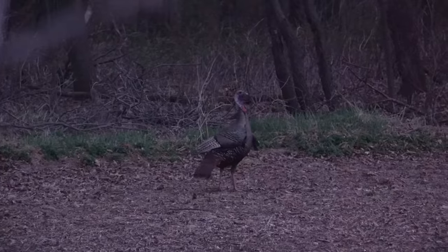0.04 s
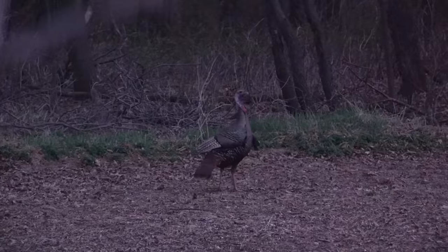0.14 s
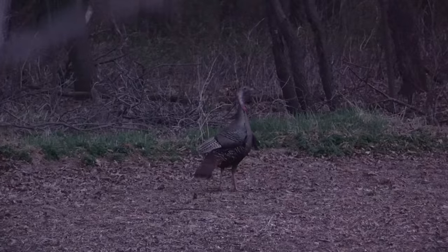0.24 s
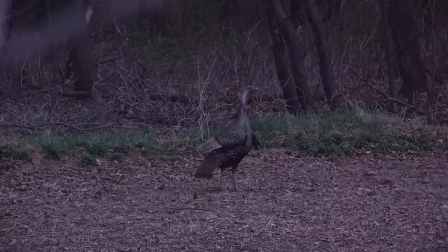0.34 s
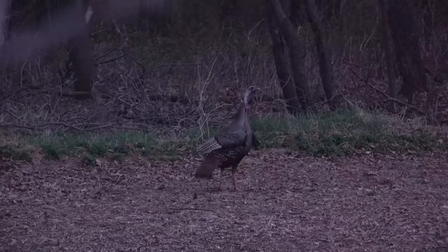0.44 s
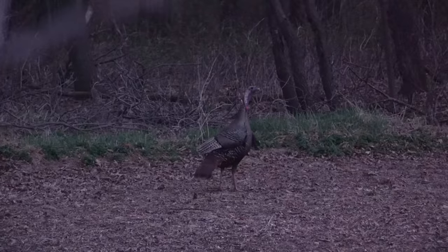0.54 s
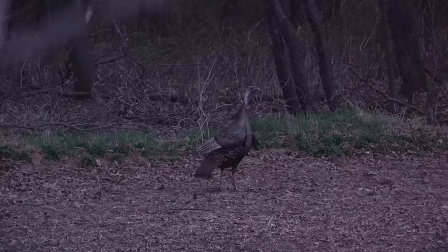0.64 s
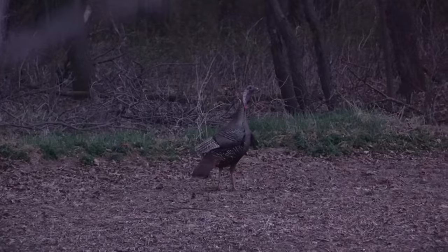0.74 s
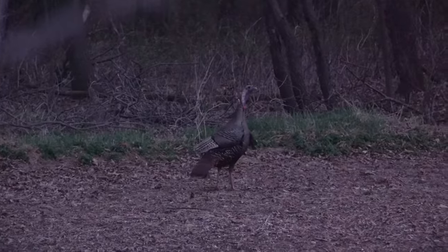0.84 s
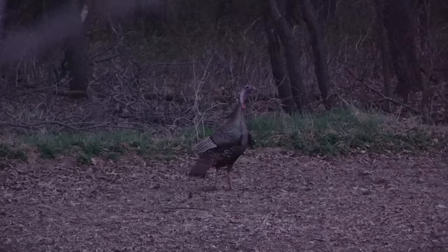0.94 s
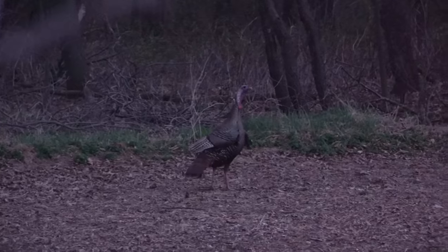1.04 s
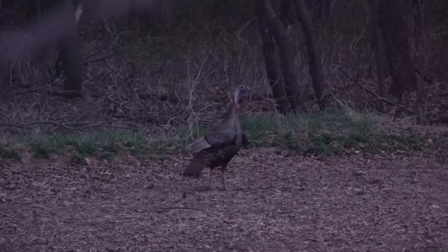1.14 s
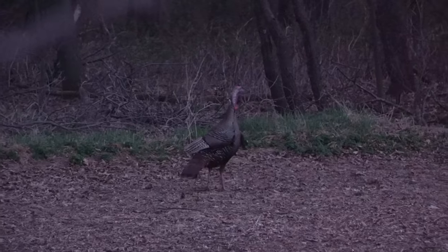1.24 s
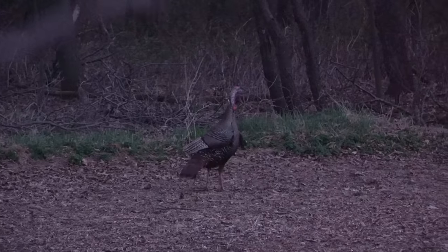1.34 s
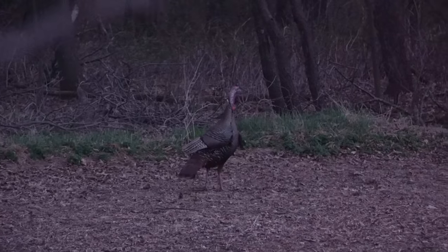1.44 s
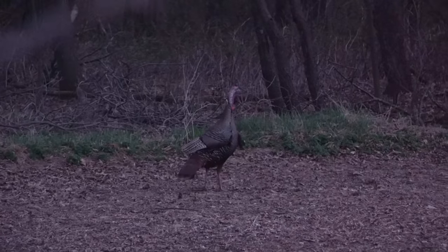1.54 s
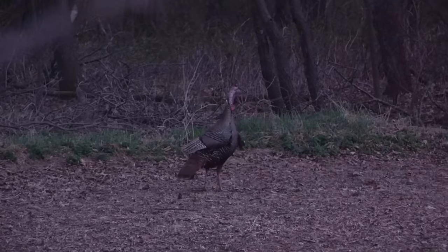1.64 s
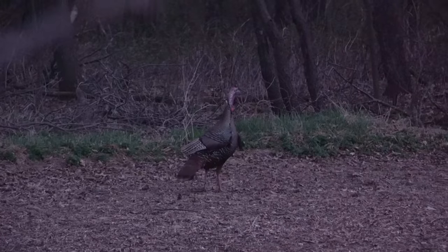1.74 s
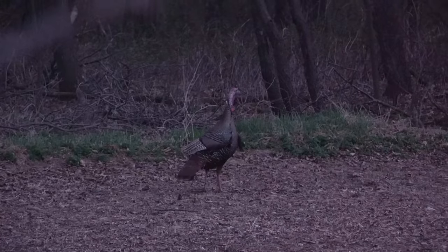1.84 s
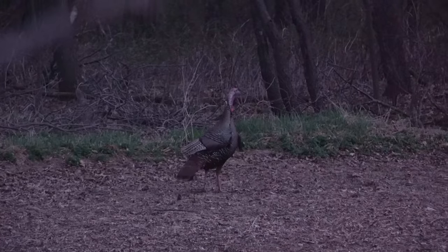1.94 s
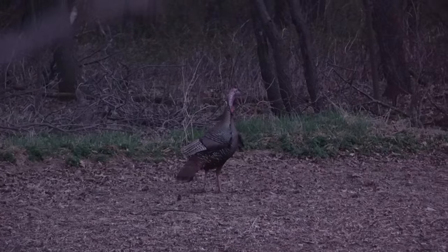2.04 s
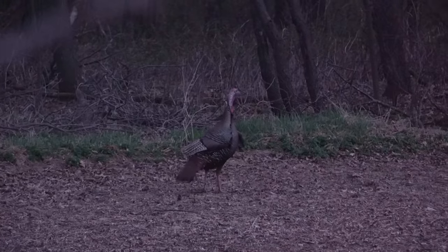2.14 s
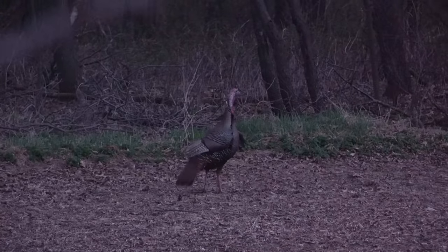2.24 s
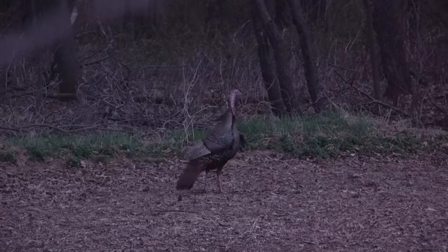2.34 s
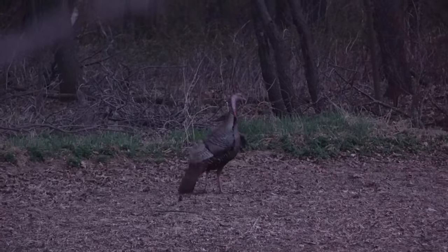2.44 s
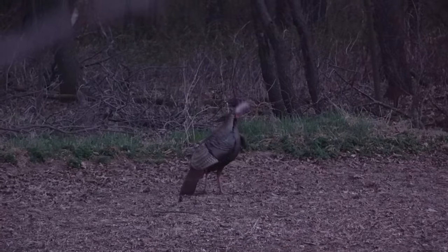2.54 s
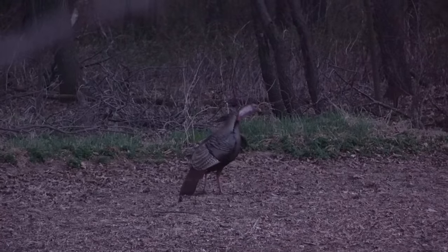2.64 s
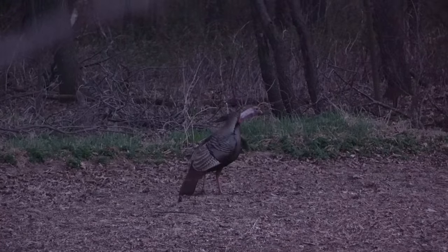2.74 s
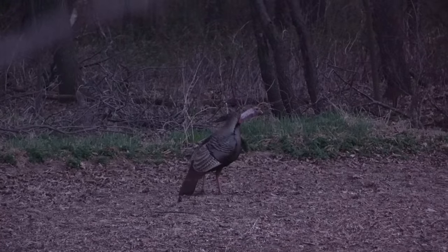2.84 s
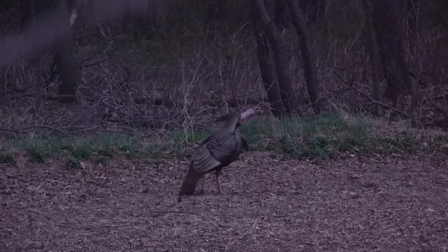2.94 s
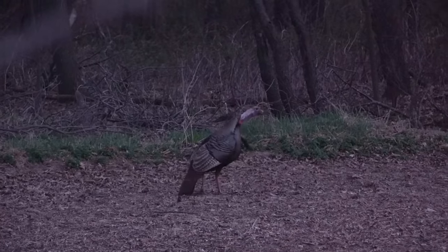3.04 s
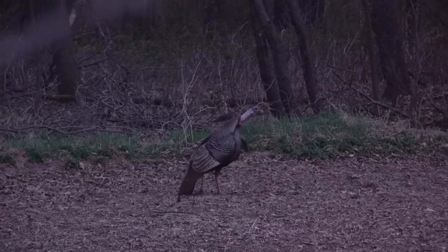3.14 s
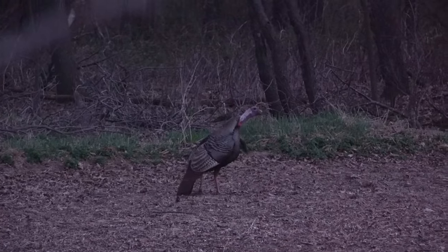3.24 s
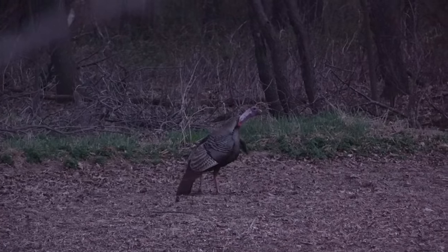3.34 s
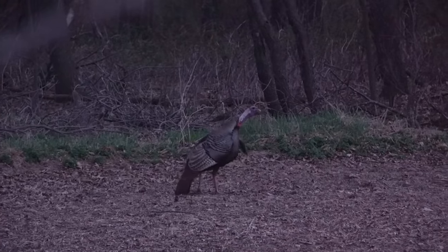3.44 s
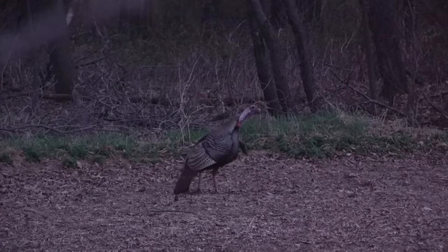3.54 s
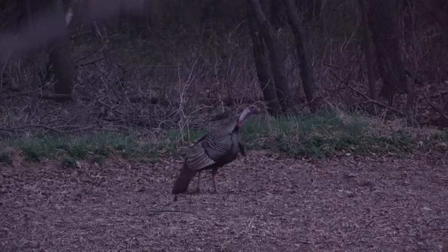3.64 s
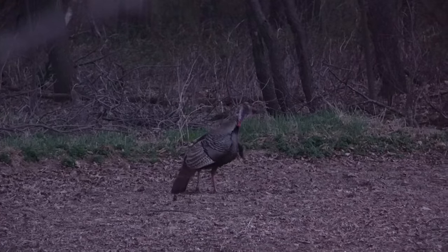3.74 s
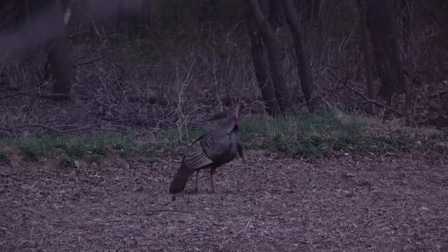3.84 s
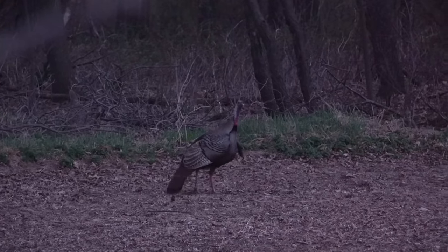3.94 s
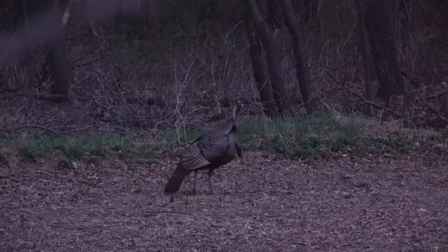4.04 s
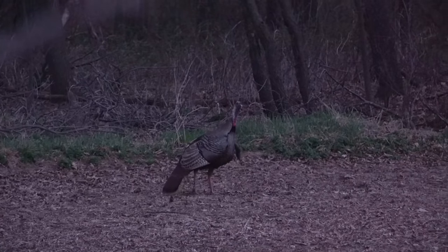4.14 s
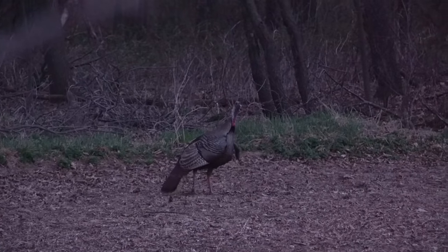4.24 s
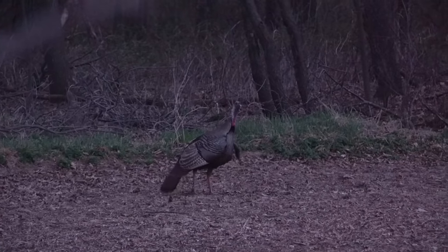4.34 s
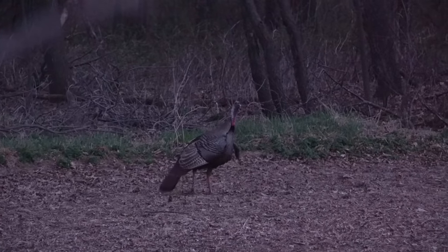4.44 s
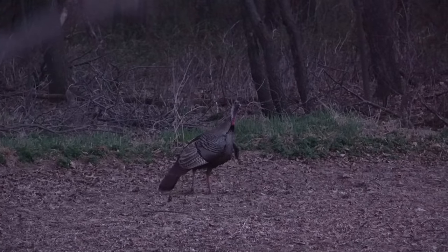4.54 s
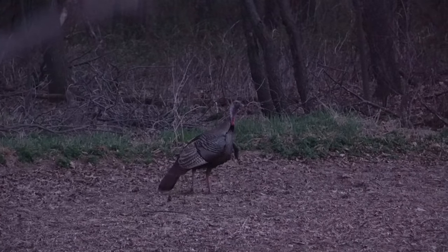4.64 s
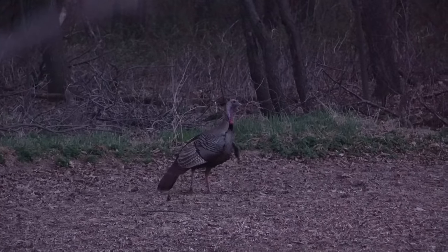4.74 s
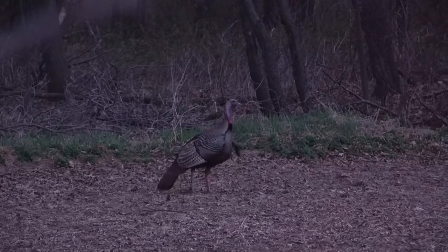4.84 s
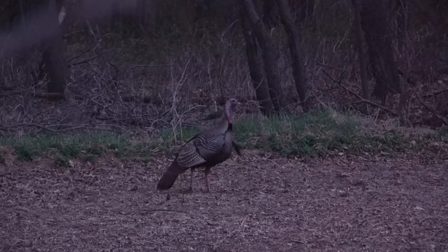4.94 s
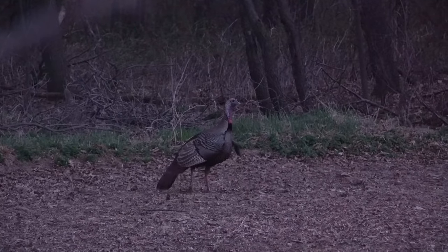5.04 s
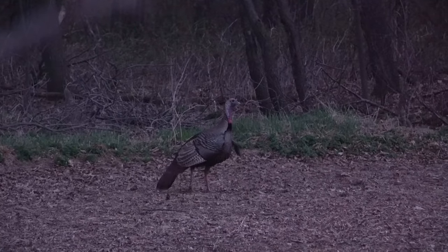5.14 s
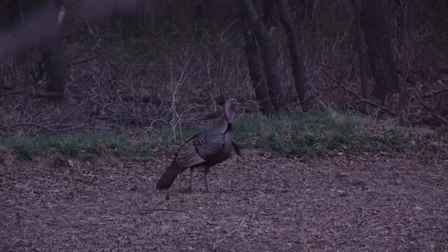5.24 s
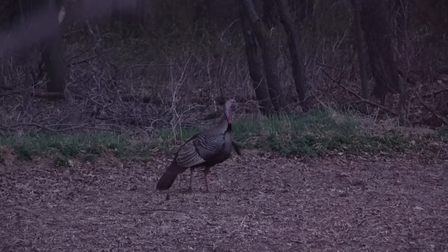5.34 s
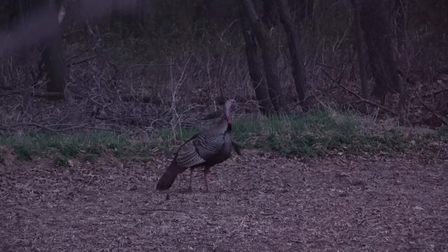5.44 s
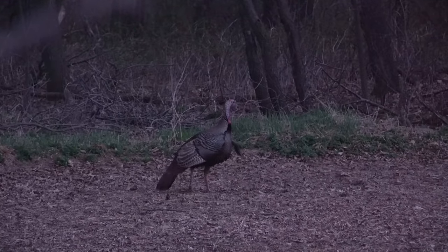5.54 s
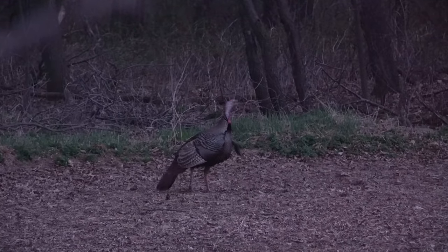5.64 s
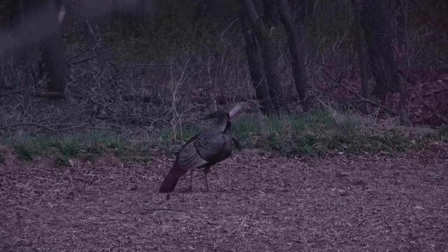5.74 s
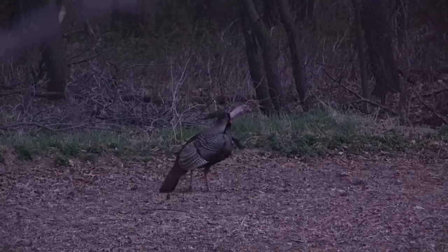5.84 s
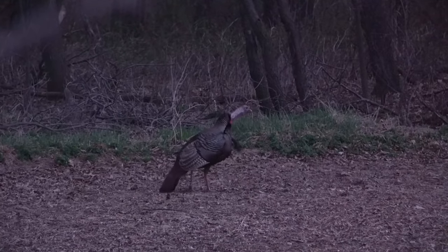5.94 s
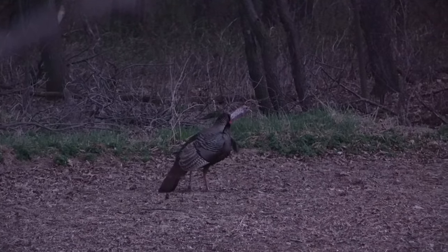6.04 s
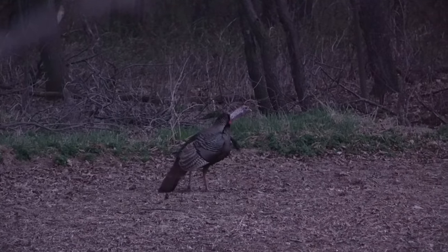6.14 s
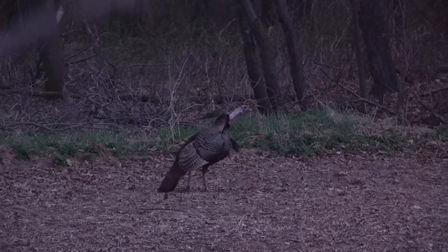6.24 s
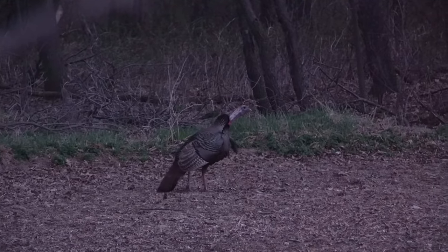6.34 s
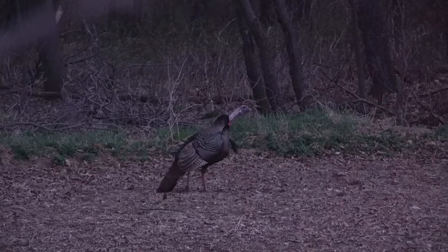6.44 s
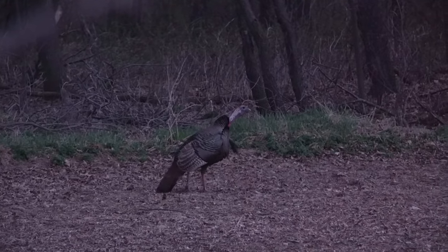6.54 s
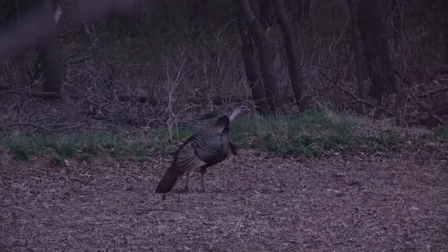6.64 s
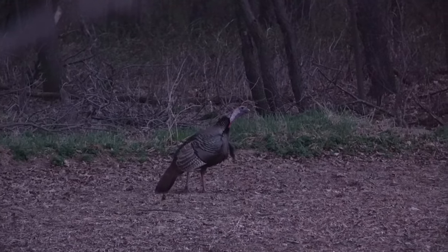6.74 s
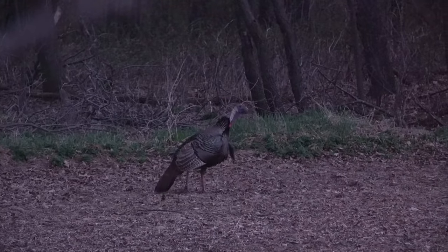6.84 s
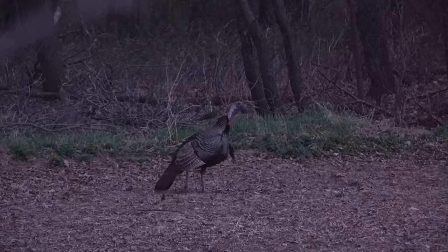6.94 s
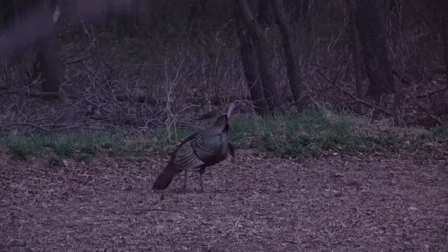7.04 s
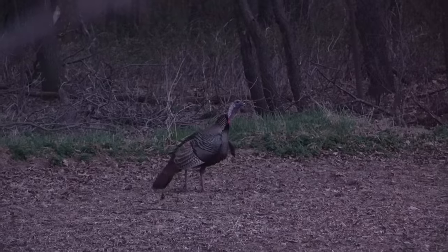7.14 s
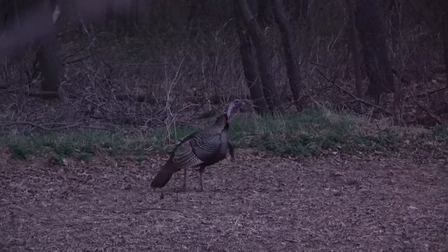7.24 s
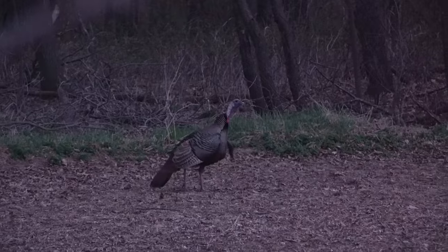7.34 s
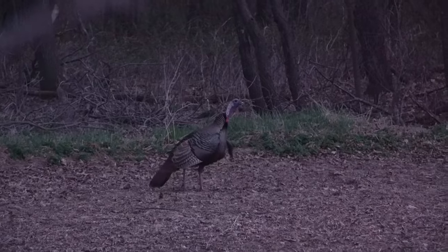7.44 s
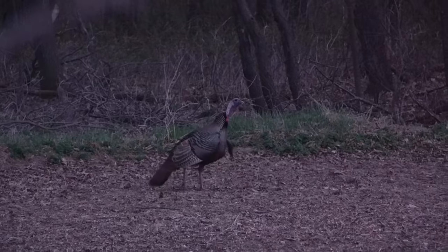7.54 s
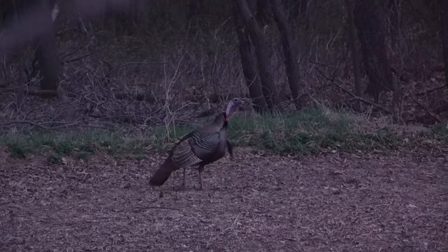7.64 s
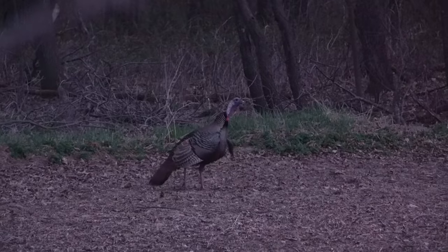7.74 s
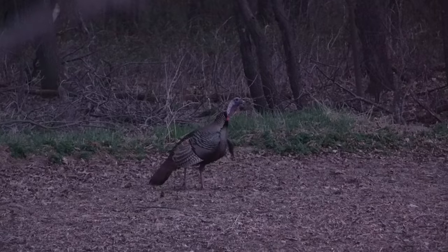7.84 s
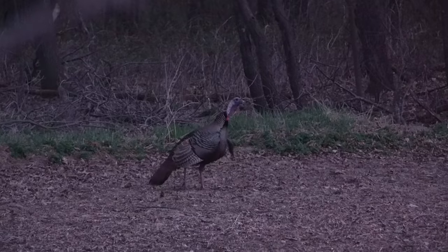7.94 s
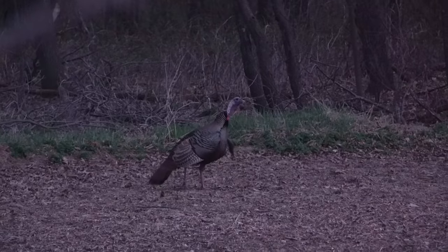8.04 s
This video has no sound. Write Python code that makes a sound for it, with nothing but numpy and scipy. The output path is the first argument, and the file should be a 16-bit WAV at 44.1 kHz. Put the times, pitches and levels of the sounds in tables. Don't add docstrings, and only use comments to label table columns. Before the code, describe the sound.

Wild turkey at a wood's edge gobbles twice in rattling bursts, with small songbird whistles, faint hoarse yelps and low wind rumble on the microphone.

```python
import sys
import numpy as np
from scipy import signal
from scipy.fft import rfft, irfft, next_fast_len
from scipy.io import wavfile
from scipy.ndimage import uniform_filter1d, map_coordinates

SR = 44100
rng = np.random.default_rng(int(sys.argv[2]) if len(sys.argv) > 2 else 0)


def ratio_of_db(decibels):
    return 10 ** (np.asarray(decibels, float) / 20)


def dump(signal):
    limited = np.clip(np.atleast_2d(signal).T, -1, 1)
    pcm = np.round(limited * 32767).astype(np.int16)
    wavfile.write(sys.argv[1], SR, pcm)


N = 356769

# centre_s, pitch_hz, chest_db, throat_db, brightness_db
GOBBLE_1 = [(2.538, 578, -33, -12.5, -35.5), (2.58, 550, -35.5, -33, -46.5), (2.605, 554.5, -31, -24, -25),
            (2.679, 598, -28, -30.5, -23.5), (2.737, 586, -34.5, -17, -25.5), (2.764, 548, -37.5, -36, -25),
            (2.79, 557, -29, -30, -32), (2.827, 586, -30, -24.5, -24.5), (2.86, 609, -26, -20.5, -26),
            (2.893, 569, -23, -18.5, -28), (2.935, 550, -25.5, -28.5, -27.5),
            (2.981, 578, -27.5, -22.5, -26), (3.045, 561.4, -17.5, -18, -24), (3.116, 569, -42, -16.5, -25),
            (3.132, 554.4, -29.5, -21.5, -43), (3.155, 580.4, -20, -50, -32.5),
            (3.181, 559.7, -21, -22, -23.5), (3.24, 557.6, -27.5, -19, -24.5),
            (3.315, 558, -18.5, -21, -24), (3.378, 566, -30.5, -35, -29.5), (3.4, 554, -27, -22, -32.5),
            (3.468, 546, -23, -23.5, -26), (3.53, 560.5, -27, -28, -29.5), (3.617, 543.6, -32, -29, -35.5),
            (3.683, 521, -41.5, -31.5, -39), (3.735, 547.6, -27, -31.5, -30.5),
            (3.804, 551.4, -32, -34, -37), (3.88, 562, -35, -61, -45.5), (3.93, 516, -40, -38, -41.5)]
# centre_s, pitch_hz, chest_db, throat_db, brightness_db
GOBBLE_2 = [(5.709, 581, -35, -21.5, -38), (5.78, 629, -28, -32, -28), (5.85, 539.5, -32, -31, -27.5),
            (5.918, 578, -23.5, -28, -25.5), (5.967, 605, -21.5, -19.5, -29), (6.017, 553, -27.5, -14, -22),
            (6.056, 582.5, -28.5, -19.5, -25), (6.1, 576.7, -24.5, -16, -29),
            (6.132, 563, -24, -22.5, -29.5), (6.188, 596, -20.5, -40.5, -30),
            (6.238, 559.5, -22.5, -16, -26), (6.27, 535, -24, -39, -29), (6.31, 544, -29, -25.5, -33),
            (6.333, 556.7, -26, -27.5, -25.5), (6.383, 581.7, -20, -22, -26), (6.426, 524, -25, -28, -44),
            (6.453, 569, -43.5, -44, -30), (6.49, 535.6, -28.5, -29.5, -35), (6.535, 551, -19, -24, -29),
            (6.585, 531, -35.5, -32.5, -28.5), (6.61, 558, -28, -38.5, -31), (6.651, 521, -43, -29.5, -36),
            (6.696, 501, -39, -40.5, -41), (6.763, 537, -23, -40, -28), (6.842, 533.4, -47, -35.5, -38.5),
            (6.87, 540, -31, -40.5, -48), (6.936, 540, -33, -44, -44)]
# harmonic, level_db
UPPER_HARMONICS = [(4, -5), (5, -22), (6, -8.5), (7, -12), (8, -30), (9, -30.5), (10, -36)]
# freq_hz, density_db
RASP_SPECTRUM = [(400, -34), (700, -6), (1150, 10), (1700, 3.5), (2700, 0.5), (3500, 3), (4400, -11),
                 (5700, -26.5), (6300, -37), (10000, -27.5)]
# centre_s, pitch_hz, level_db
SECOND_VOICE_1 = [(2.534, 1147, -16.5), (2.582, 1167, -16.5), (2.621, 1176, -25), (2.652, 1262, -27.5),
                  (2.679, 1050, -14.5), (2.733, 1036, -18), (2.769, 1042, -25), (2.791, 1081, -22),
                  (2.853, 1251, -19), (2.88, 1002, -16), (2.901, 1181, -14), (2.989, 955, -20),
                  (3.035, 1016, -22.5), (3.077, 1020, -20.5), (3.115, 996, -15), (3.155, 919, -17),
                  (3.188, 928, -21), (3.221, 985, -23.5), (3.244, 960, -17.5), (3.271, 994, -18),
                  (3.303, 926, -19.5), (3.349, 955, -21.5), (3.389, 897, -18.5), (3.435, 944, -24.5),
                  (3.481, 955, -22), (3.538, 933, -15.5), (3.569, 864, -28), (3.619, 890, -16),
                  (3.64, 843, -37), (3.681, 840, -28), (3.72, 878, -18.5), (3.801, 882, -19),
                  (3.839, 904, -41), (3.872, 880, -30), (3.901, 873, -23), (3.958, 878, -28.5),
                  (3.985, 897, -28.5), (4.03, 860, -40)]
# centre_s, pitch_hz, level_db
SECOND_VOICE_2 = [(5.711, 1196, -11.5), (5.747, 1131, -25.5), (5.773, 1237, -15), (5.803, 1140, -21.5),
                  (5.836, 1270, -22.5), (5.859, 1218, -19), (5.914, 1023, -15.5), (5.969, 1261, -21.5),
                  (5.997, 987, -17), (6.046, 1162, -15), (6.117, 1161, -16), (6.162, 1133, -41),
                  (6.195, 964, -19.5), (6.229, 999, -23), (6.262, 1002, -16.5), (6.297, 1115, -22.5),
                  (6.331, 968, -24), (6.361, 946, -19), (6.395, 976, -21), (6.436, 880, -36.5),
                  (6.462, 937, -25), (6.485, 885, -24.5), (6.539, 890, -23), (6.573, 868, -19.5),
                  (6.616, 950.5, -15), (6.647, 867.5, -24), (6.695, 954, -21), (6.748, 868, -26.5),
                  (6.78, 910, -45.5), (6.829, 874, -21.5), (6.879, 870, -37), (6.9, 855, -25),
                  (6.935, 870, -28), (6.972, 846, -28.5), (7.019, 889, -31), (7.075, 880, -36)]
# start_s, length_s, pitch_hz, level_db
HELD_WHISTLES = [(0, 0.029, 2650, -49), (0.357, 0.068, 2010, -53), (0.407, 0.027, 3040, -40.5),
                 (0.494, 0.055, 2700, -44.5), (0.5, 0.091, 2330, -51), (0.878, 0.023, 3250, -38),
                 (0.897, 0.047, 2320, -39), (0.95, 0.13, 2296, -48), (0.907, 0.049, 3080, -49),
                 (1.108, 0.04, 2590, -50), (1.005, 0.049, 2490, -51), (1.56, 0.028, 3220, -53),
                 (1.701, 0.12, 3000, -53.5), (2.134, 0.03, 2757, -39), (2.456, 0.058, 3134, -39.5),
                 (4.185, 0.045, 3150, -49), (4.571, 0.073, 2306, -36.5), (4.702, 0.096, 3100, -49.5),
                 (4.743, 0.065, 2210, -45), (4.729, 0.02, 2380, -39), (0.334, 0.027, 2730, -46),
                 (1.065, 0.034, 2800, -45), (3.746, 0.017, 2820, -36), (4.703, 0.13, 2640, -49.5),
                 (4.75, 0.054, 2930, -55.5), (4.981, 0.11, 3570, -57.5), (4.893, 0.046, 2445, -54),
                 (7.789, 0.024, 2320, -49)]
# start_s, length_s, top_hz, level_db
SWOOP_WHISTLES = [(0.333, 0.02, 2560, -44), (0.888, 0.02, 3280, -45), (1.08, 0.03, 2610, -47),
                  (1.482, 0.07, 2950, -53), (1.964, 0.027, 3010, -45), (2.155, 0.038, 2430, -40),
                  (2.311, 0.064, 2650, -52), (3.574, 0.066, 2780, -43.5), (4.116, 0.036, 2800, -49),
                  (5.129, 0.06, 3480, -35.5), (5.259, 0.028, 2445, -35), (7.239, 0.062, 2780, -47),
                  (7.759, 0.04, 2815, -49), (7.933, 0.046, 2830, -49.5)]
# start_s, length_s, first_hz, last_hz, level_db
GLIDE_WHISTLES = [(0.255, 0.043, 2380, 2650, -52), (0.362, 0.05, 2380, 2180, -53),
                  (1.41, 0.04, 3300, 3230, -48), (1.439, 0.1, 3194, 3158, -37.5),
                  (1.943, 0.038, 2860, 2735, -47.5), (4.045, 0.13, 3230, 3110, -34),
                  (4.225, 0.064, 2517, 2530, -39), (4.3, 0.096, 2560, 2740, -47.5),
                  (5.398, 0.043, 2520, 2330, -36.5), (5.525, 0.1, 1250, 810, -48.5),
                  (4.769, 0.042, 1306, 1055, -47), (0.452, 0.034, 2250, 2415, -35),
                  (0.826, 0.033, 2880, 2930, -49), (0.851, 0.039, 2890, 3250, -42),
                  (1.56, 0.037, 3270, 2790, -55), (1.595, 0.16, 2394, 2620, -45),
                  (2.046, 0.024, 3160, 2850, -40), (2.096, 0.03, 2295, 2403, -39),
                  (2.393, 0.024, 2210, 2450, -49.5), (3.54, 0.045, 2934, 3270, -39.5),
                  (4.395, 0.033, 2660, 3024, -50), (4.644, 0.022, 3550, 2740, -32.5),
                  (4.588, 0.048, 2600, 2760, -50), (5.145, 0.034, 3300, 2980, -60),
                  (4.668, 0.024, 2370, 2600, -34), (5.209, 0.024, 2293, 3000, -43),
                  (5.225, 0.029, 2910, 3134, -31), (5.356, 0.047, 2830, 2520, -43),
                  (6.895, 0.022, 3350, 3660, -37.5), (6.903, 0.014, 3760, 4660, -46),
                  (6.945, 0.022, 4860, 2860, -42), (7.17, 0.017, 2270, 2420, -45.5),
                  (7.514, 0.065, 2545, 2790, -55), (7.866, 0.026, 2290, 3270, -55),
                  (7.227, 0.025, 3040, 2800, -52), (7.905, 0.035, 2830, 2790, -52),
                  (8.033, 0.012, 2534, 3140, -54), (7.68, 0.09, 1230, 1100, -55.5)]
# start_s, length_s, pitch_hz, level_db
FAR_COOS = [(1.602, 0.041, 1040, -34), (1.84, 0.05, 1130, -34), (1.895, 0.115, 1130, -36),
            (2.05, 0.059, 1100, -41), (2.165, 0.06, 1040, -42), (2.225, 0.06, 960, -41),
            (2.422, 0.11, 1100, -42.5), (4.1, 0.071, 752, -34.5), (4.63, 0.183, 770, -35.5),
            (4.98, 0.16, 497, -35), (5.33, 0.2, 780, -39), (5.56, .12, 510, -44), (5.655, 0.03, 1410, -34),
            (5.678, 0.018, 900, -28), (6.99, 0.035, 630, -36), (7.045, 0.03, 600, -38),
            (7.105, 0.04, 1340, -48), (7.11, 0.05, 860, -43), (7.195, 0.05, 590, -38),
            (7.265, 0.04, 590, -37), (7.36, 0.07, 790, -43), (7.38, 0.035, 660, -38), (7.42, 0.1, 602, -38),
            (7.43, 0.05, 1320, -48), (7.75, 0.04, 800, -43), (7.785, 0.11, 600, -39),
            (7.945, 0.18, 752, -38)]
# centre_s, level_db
YELP_TIMES = [(0.762, -50), (1.051, -47.5), (1.322, -44), (1.608, -46), (1.919, -47), (2.219, -44),
              (4.117, -38.5), (4.418, -38), (4.73, -34), (5.035, -37.5), (5.355, -36.5)]
# freq_hz, width_hz, level_db
THROAT_PEAKS = [(1030, 160, 0), (1480, 260, 1), (2050, 300, -16)]
# centre_s, length_s, level_db
LEAF_PUFFS = [
    (2.603, .035, -52),
    (3.95, 1.1, -62),
    (6.057, .025, -53),
    (6.19, .012, -56),
]
# freq_hz, density_db
RUSTLE_SPECTRUM = [(2500, -29.5), (5000, 6), (8000, 6.5), (10500, -3), (14000, -28.5)]
# freq_hz, t60_s
TRUNK_T60 = [(300, .5), (1000, .36), (2000, 0.4), (4000, 0.4), (8000, 0.22)]
# time_s, level_db
GUST_STRENGTH = [(0.06, -40), (0.5, -41), (1.21, -43.5), (1.5, -48.5), (2.17, -45.5), (3.12, -42),
                 (3.57, -46.5), (3.99, -39), (5.63, -46.5), (5.94, -47.5), (6.45, -42.5), (7.1, -45),
                 (7.3, -35), (7.6, -36.5), (8.03, -40)]
# freq_hz, density_db
RUMBLE_SPECTRUM = [(2.9, -46.5), (5.0, 0.5), (16, 7), (30, -0.5), (78, -11), (200, -30.5), (260, -50),
                   (440, -120)]
# freq_hz, density_db
GUST_MID_SPECTRUM = [(88, 1.5), (150, -6), (262, 1), (318, 1), (551, -6), (601, -5.5), (1360, -19.5),
                     (1500, -52), (1950, -69), (3300, -120)]
# freq_hz, density_db
GUST_SIDE_SPECTRUM = [(8.8, -30), (15, -27), (134, 0), (212, -15.5), (316, -13), (389, -3.5), (510, -4),
                      (1420, -21), (2200, -20), (2860, -29), (4840, -120)]
# freq_hz, density_db
BLUR_SPECTRUM = [(650, -15.5), (1100, 4), (1200, -6), (1500, 3), (2490, 2.5), (2940, -2), (3410, 4),
                 (4070, -9.5), (5060, -41.5), (6580, -34.5), (11100, -120)]
# freq_hz, density_db
HISS_SPECTRUM = [(800, -31.5), (1500, -3.5), (5000, 0), (9000, -4.5), (15000, -4.5), (20000, -20.5)]
# freq_hz, level_db
WHINE_TONES = [(9000, -84), (11500, -86), (12500, -82), (13500, -83), (14500, -84), (15000, -86)]

SETTLE_S = .06


def rms_one(x):
    return x / np.sqrt(np.mean(x ** 2) + 1e-20)


def at_hz(points, hz):
    table_hz, value = np.transpose(points)
    return np.interp(np.log(hz + 0.00084), np.log(table_hz), value)


def coloured(spectrum):
    size = next_fast_len(N)
    hz = np.fft.rfftfreq(size, 1 / SR)
    bins = rfft(rng.standard_normal(size)) * ratio_of_db(at_hz(spectrum, hz))
    return rms_one(irfft(bins, size)[:N])


def drift(rate_hz):
    coarse = np.arange(0, N + 16, 16)
    curve = map_coordinates(rng.standard_normal(4000), [coarse / SR * rate_hz], order=3)
    return np.interp(np.arange(N), coarse, curve)


def resonance(x, hz, width_hz):
    r = np.exp(-np.pi * width_hz / SR)
    b = [(1 - r * r) / 2, 0, (r * r - 1) / 2]
    a = [1, -2 * r * np.cos(2 * np.pi * hz / SR), r * r]
    return signal.lfilter(b, a, x)


def lowpass(x, order, cut_hz):
    return signal.sosfilt(signal.butter(order, cut_hz, fs=SR, output="sos"), x)


def add(track, start_s, piece):
    at = max(round(start_s * SR), 0)
    track[at:at + len(piece)] += piece[:N - at]


def with_age(*bouts):
    return [(row[0] - notes[0][0], *row) for notes in bouts for row in notes]


def gobble():
    chest_gain_db, third_gain_db, bright_gain_db, octave_gain_db = 7, 3, 8.5, -2
    top_gain_db_per_s, fourth_fade_db_per_s = 5, 3
    note_lean = .025
    muffled_hz, muffled_s = 4000, 0.21
    out = np.zeros(N)
    rasp = coloured(RASP_SPECTRUM) * ratio_of_db(2.5 * drift(130) - 1)
    muffled = lowpass(rasp, 6, muffled_hz)
    wobble = .011 * drift(120)
    flutter = [ratio_of_db(3.5 * drift(100)) for _ in range(4)]
    rows = with_age(GOBBLE_1, GOBBLE_2)
    phases = rng.uniform(0, 2 * np.pi, (len(rows), 12))
    for (age, centre, hz, chest_db, third_db, bright_db), phase in zip(rows, phases):
        opening = age == 0
        if opening:
            length_s, arch, lean, swell_power, bright_power = .056, .33, 0, .45, 1
        else:
            length_s, arch = .047, .04 + .25 * np.exp(-age / SETTLE_S)
            lean, swell_power, bright_power = note_lean * np.cos(phase[-1]), .75, 1.7
        place = np.linspace(-1, 1, round(length_s * SR))
        at = round((centre - length_s / 2) * SR)
        span = slice(at, at + len(place))
        swell = np.cos(place * np.pi / 2) ** swell_power
        pitch_hz = hz * (1 - arch * place ** 2 + lean * place + wobble[span])
        turn = 2 * np.pi * np.cumsum(pitch_hz) / SR

        low = [(1, chest_db + chest_gain_db),
               (2, (chest_db + third_db) / 2 + octave_gain_db),
               (3, third_db + third_gain_db)]
        voice = np.zeros(len(place))
        for k, db in low:
            waver = flutter[k - 1][span] ** min(0.5 + 9 * age, 1)
            voice += ratio_of_db(db) * waver * np.sin(k * turn + phase[k])

        upper = np.zeros(len(place))
        for k, db in UPPER_HARMONICS:
            db += age * (top_gain_db_per_s * (k > 7) - fourth_fade_db_per_s * (k == 4))
            upper += ratio_of_db(db) * flutter[k % 4][span] * np.sin(k * turn + phase[k])
        hoarse = rasp[span] + np.exp(-age / muffled_s) * (muffled[span] - rasp[span])
        upper += ratio_of_db(-4 + 10 * np.exp(-age / .3)) * hoarse * (1 + .7 * np.sin(turn))
        voice += ratio_of_db(bright_db + bright_gain_db) * upper * swell ** bright_power
        add(out, centre - length_s / 2, voice * swell)
    return out


def second_voice():
    note_s, droop, gain_db = .035, .02, 4
    out, wobble, flutter = np.zeros(N), .04 * drift(300), ratio_of_db(3.2 * drift(180))
    place = np.linspace(-1, 1, round(note_s * SR))
    swell = np.cos(place * np.pi / 2) ** 0.9
    for age, centre, hz, level_db in with_age(SECOND_VOICE_1, SECOND_VOICE_2):
        scoop = .2 * np.exp(-age / SETTLE_S) * np.minimum(place, 0) ** 2
        at = round((centre - note_s / 2) * SR)
        pitch_hz = hz * (1 - scoop - droop * place + wobble[at:at + len(place)])
        turn = 2 * np.pi * np.cumsum(pitch_hz) / SR
        tone = np.sin(turn) + ratio_of_db(-21) * np.sin(2 * turn)
        add(out, at / SR, ratio_of_db(level_db + gain_db) * swell * tone)
    return out * flutter


def whistles(rows, tremble_db):
    out, tremble, waver = np.zeros(N), ratio_of_db(tremble_db * drift(55)), .006 * drift(50)
    for start, length, first_hz, middle_hz, last_hz, level_db in rows:
        place = np.linspace(0, 1, round(length * SR))
        hz = np.interp(place, [0, .5, 1], [first_hz, middle_hz, last_hz])
        hz = uniform_filter1d(hz, len(place) // 4, mode="nearest")
        hz *= 1 + np.roll(waver, -round(start * SR))[:len(place)]
        attack = place * length / (.006 + .09 * length)
        release = (1 - place) * length / .009
        edge = np.clip(np.minimum(attack, release), 0, 1)
        edge *= ratio_of_db(-22 * length * (place - .5))
        add(out, start, ratio_of_db(level_db) * edge * np.sin(2 * np.pi * np.cumsum(hz) / SR))
    return out * tremble


def songbirds():
    rest_hz, halfway = 2260, .76
    rows = [(s, length, hz * 1.025, hz, hz * .99, db) for s, length, hz, db in HELD_WHISTLES]
    for s, length, top_hz, db in SWOOP_WHISTLES:
        rows.append((s, length, top_hz, top_hz + halfway * (rest_hz - top_hz), rest_hz, db))
    for s, length, first_hz, last_hz, db in GLIDE_WHISTLES:
        rows.append((s, length, first_hz, (first_hz + last_hz) / 2, last_hz, db))
    return whistles(rows, tremble_db=1.7)


def far_coos():
    return whistles([(s, length, hz, hz, hz, db) for s, length, hz, db in FAR_COOS], tremble_db=3)


def crow_stutter():
    start_s, gap_s, pip_s, pip_db = 1.676, .034, .02, -39
    crow_hz, climb_hz, droop_hz = 1150, 150, 45
    rows = []
    for k in range(5):
        hz = crow_hz - climb_hz * 3. ** -k
        rows.append((start_s + gap_s * k, pip_s, hz + droop_hz, hz, hz - droop_hz, pip_db))
    return whistles(rows, tremble_db=0)


def yelps():
    yelp_s, pitch_hz = 0.1, 521
    out, shake, breath = np.zeros(N), drift(150), rng.standard_normal(N)
    place = np.linspace(-1, 1, round(yelp_s * SR))
    for centre, level_db in YELP_TIMES:
        at = round(centre * SR)
        span = slice(at, at + len(place))
        turn = np.cumsum(pitch_hz * (1 - 0.0532 * place + 0.034 * shake[span])) / SR
        pulses = np.diff(np.floor(turn), prepend=0)
        source = rms_one(pulses) + 2.0 * breath[span]
        throat = sum(ratio_of_db(db) * resonance(resonance(source, f, w), f, w) for f, w, db in THROAT_PEAKS)
        add(out, centre - yelp_s / 2, ratio_of_db(level_db) * rms_one(throat) * np.cos(place * np.pi / 2))
    return out


def rustles():
    out = np.zeros(N)
    for centre, length, level_db in LEAF_PUFFS:
        add(out, centre - length / 2, ratio_of_db(level_db) * np.hanning(round(length * SR)))
    return out * coloured(RUSTLE_SPECTRUM)


def chorus():
    start, length, pitch, bend, size = rng.random((110, 5)).T
    hz = 2000 + 1600 * pitch
    first_hz, last_hz = hz + 500 * (bend - .4), hz - 150 * (bend - .5)
    rows = np.transpose([8 * start, .04 + .14 * length, first_hz, hz, last_hz, -62 + 6 * size])
    return whistles(rows, tremble_db=3.5)


def wood(x):
    t = np.arange(SR) / SR
    white, tail = rng.standard_normal((2, SR)), np.zeros((2, SR))
    for low_hz in 250 * 2. ** np.arange(5):
        octave = signal.butter(2, [low_hz, 2 * low_hz], "band", fs=SR, output="sos")
        tail += signal.sosfilt(octave, white) * ratio_of_db(-60 * t / at_hz(TRUNK_T60, 1.4 * low_hz))
    tail *= np.clip((t - .008) / 0.013, 0, 1)
    tail /= np.sqrt(np.sum(tail[0] ** 2))
    mid, side = signal.fftconvolve(x[None], tail, axes=1)[:, :N]
    return mid, side


def sway(wet):
    spread_s = .00035
    path = np.arange(N) - spread_s * SR * (3 + drift(35))
    return np.interp(path, np.arange(N), wet) * ratio_of_db(2.5 * drift(45))


def wind():
    t = np.arange(N) / SR
    gust_db = np.interp(t, *np.transpose(GUST_STRENGTH))
    duck = sum(np.exp(-((t - notes[0][0] - 0.58) / 0.49) ** 2) for notes in (GOBBLE_1, GOBBLE_2))
    rumble_db = -13.5 + 0.03 * (gust_db - gust_db.mean()) - 4 * duck
    rumble = 0.67 * np.tanh(ratio_of_db(rumble_db + 2.5) * coloured(RUMBLE_SPECTRUM) / 0.62)
    rumble -= 0.7 * np.exp(-t / 0.037)
    rumble -= 0.23 * np.exp((t - t[-1]) / .006)
    gust = ratio_of_db(gust_db + 2.5 + 1.4 * drift(8))
    shared = gust * coloured(GUST_MID_SPECTRUM)
    blur = ratio_of_db(-48.5 + .8 * drift(6)) * coloured(BLUR_SPECTRUM)
    mid = rumble + shared + blur
    side = gust * ratio_of_db(-3.5) * coloured(GUST_SIDE_SPECTRUM)
    side += .5 * resonance(shared, 300, 110)
    side += ratio_of_db(rumble_db - 32.5) * coloured(RUMBLE_SPECTRUM)
    return mid, side


def preamp_hiss():
    shared = coloured(HISS_SPECTRUM)
    levels_db = (-52.5, -53.7)
    return np.array([ratio_of_db(db) * rms_one(coloured(HISS_SPECTRUM) + 0.095 * shared) for db in levels_db])


def clock_whine():
    t = np.arange(N) / SR
    return sum(ratio_of_db(db + 3) * np.sin(2 * np.pi * hz * t) for hz, db in WHINE_TONES)


def scene():
    near = (gobble() + second_voice()) * ratio_of_db(-6.0)
    near = lowpass(near, 4, 6500)
    birds = songbirds() * ratio_of_db(5.5) + chorus()
    far = far_coos() * ratio_of_db(-4.0) + crow_stutter() + yelps()
    leaves = rustles()
    wet, wet_side = wood(near * ratio_of_db(-7.0) + birds * ratio_of_db(-6) + far * ratio_of_db(-9))
    wet = sway(wet)
    wind_mid, wind_side = wind()
    mid = wind_mid + near + birds + far + wet + leaves
    lean = resonance((near + wet + far)[::-1], 630, 177)[::-1]
    side = wind_side + lean
    side = side + ratio_of_db(2.0) * resonance(wet_side, 520, 275) + ratio_of_db(-32.0) * (far + wet_side)
    return np.array([mid + side, mid - side])


def band_limit(x):
    return signal.sosfilt(signal.butter(12, 15790, fs=SR, output="sos"), x)


def record(dry):
    x = dry + preamp_hiss() + clock_whine()
    x = x / (1 + (np.abs(x) / .95) ** 4) ** (1 / 4)
    return band_limit(x)


dry = scene()
out = record(dry)
dump(out)
```